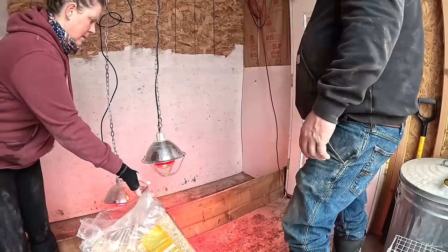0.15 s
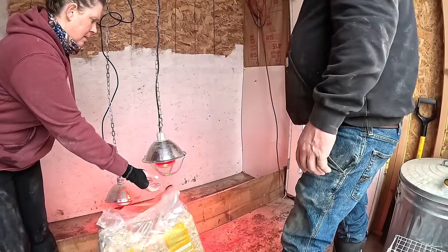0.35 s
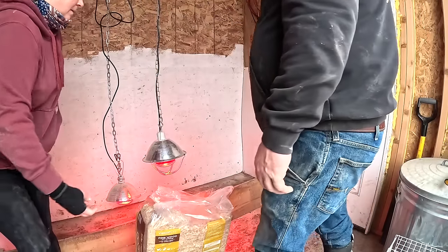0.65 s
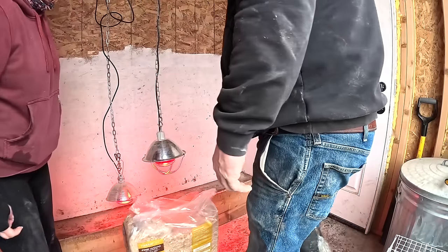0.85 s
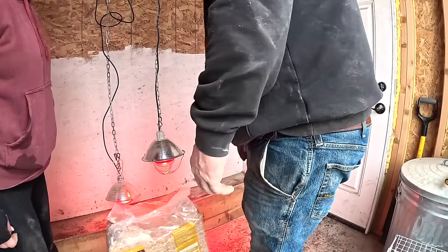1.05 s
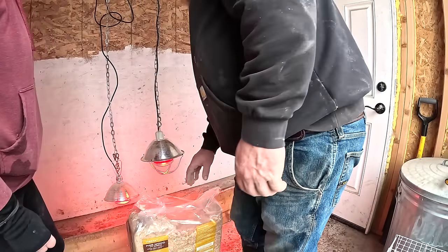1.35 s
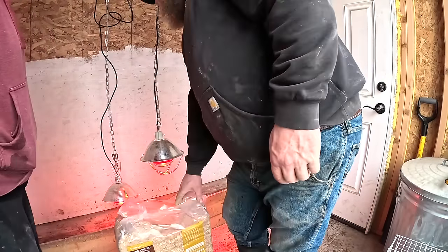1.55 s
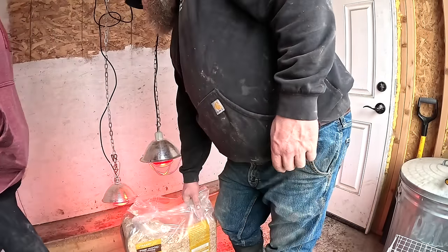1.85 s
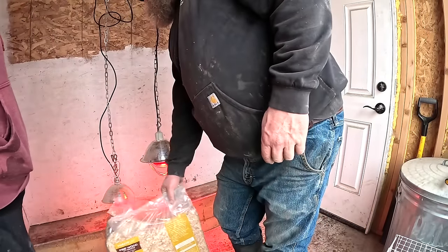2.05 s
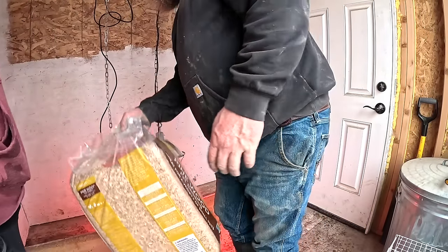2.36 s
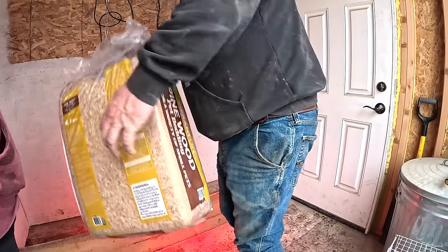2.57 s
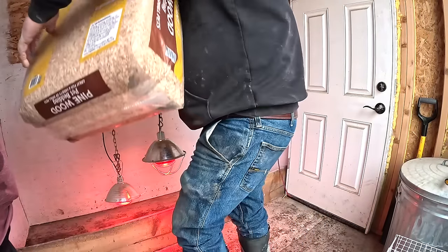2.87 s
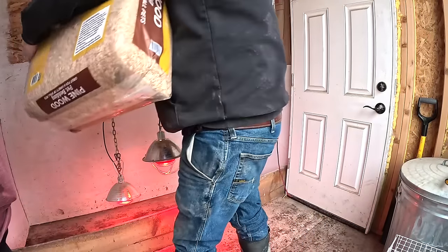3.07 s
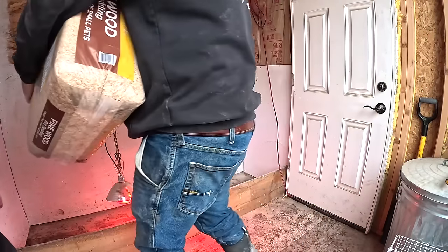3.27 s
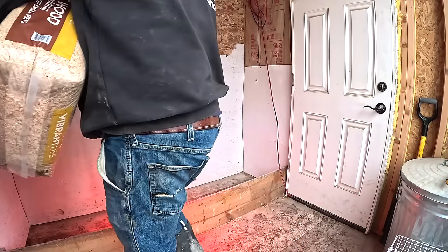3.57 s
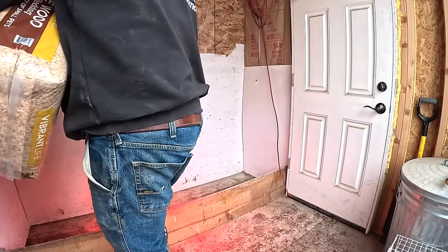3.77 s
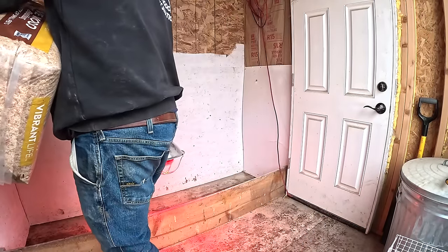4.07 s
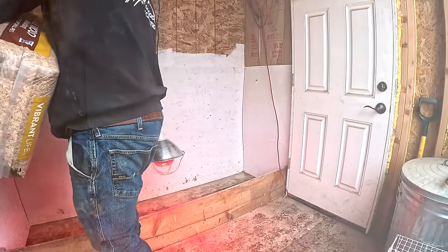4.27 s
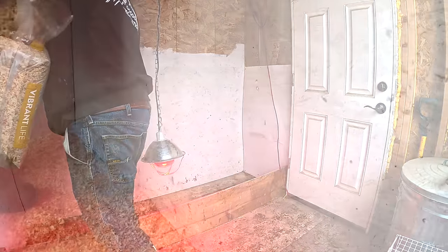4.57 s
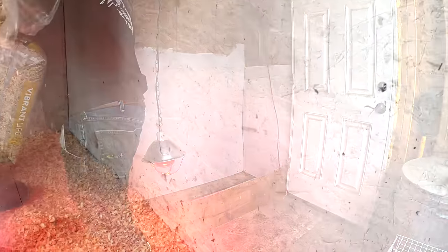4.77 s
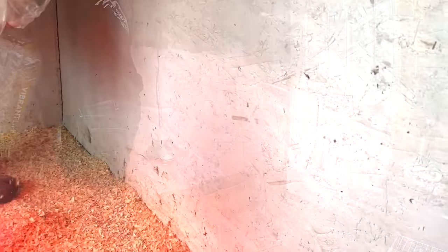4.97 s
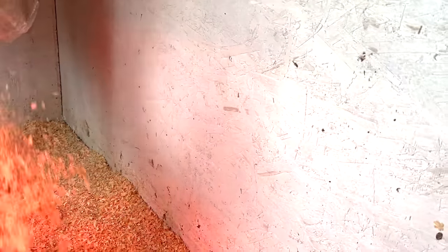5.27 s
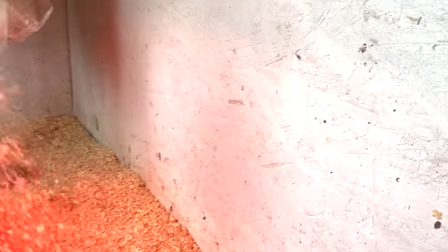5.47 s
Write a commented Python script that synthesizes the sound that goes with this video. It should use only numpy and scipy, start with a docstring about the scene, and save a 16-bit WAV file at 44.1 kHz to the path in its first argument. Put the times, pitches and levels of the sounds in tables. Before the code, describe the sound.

Close stereo camera sound inside a tight wooden room: low booming knocks and crunching packed shavings at first, slightly left, then quieter boot steps with one faint squeak. Sharp plastic crackles mark the bale being picked up; another strong floor thud, light rustling and softer steps lead to surging, fizzy spills of dry flakes.

```python
"""Boots and a bale of wood shavings strike the hollow floor of a small wooden coop: each blow rings decaying modes.
The bale, dragged in and tipped upright, crunches in bursts of dull grains; its plastic wrap rustles as
trains of random clicks and snaps as short ringing tones while the bale is lifted and swung.
The shavings then pour out in hissing, pattering surges of dense random impacts.
Behind them a boot squeaks once and filtered noise makes the floor sway and drum under shifting weight."""
import sys
import numpy as np
from scipy import signal
from scipy.fft import rfft, irfft, next_fast_len
from scipy.io import wavfile
from scipy.ndimage import map_coordinates

SR = 44100
rng = np.random.default_rng(int(sys.argv[2]) if len(sys.argv) > 2 else 0)


def dump_mix(stems):
    """Bounce the given channels to the path in sys.argv[1] as a 16-bit WAV at rate SR."""
    frames = np.atleast_2d(stems).T  # one column per channel
    limited = np.clip(frames, -1, 1)  # hard clip at full scale
    pcm = np.round(limited * 32767).astype(np.int16)
    wavfile.write(sys.argv[1], SR, pcm)


N = 248283

# Blows on the floor: (time [s], relative level [dB], contact time [s], scuff relative to ringing [dB])
FLOOR_BLOWS = [(.002,-17,0.0055,-6),(.068,-25,0.00071,-18),(.144,-26.5,0.0023,2.5),(.396,-17,0.00099,6.5),(0.421,-9.5,0.0011,-1),(.445,-11,.0028,0.5),
               (.566,-28,0.0087,-6),(.655,-19,0.004,-4.5),(.922,-27,0.0078,-8),(1.133,-16,0.0032,-21),(1.195,-19,0.0049,-21),(1.476,-19,0.01,-11.5),(2.021,-25.5,0.013,-16),(2.131,-25,.011,-12),
               (2.81,-36,0.0028,1),(3.001,-9,0.0081,-7),(3.028,-9.5,0.007,-7.5),(3.338,-18.5,0.0046,-3),(3.475,-32.5,.005,-3),(4.024,-16,0.0073,-22),(4.048,-14,0.0056,-11),(4.101,-19.5,0.0013,-2),
               (4.235,-18.5,.0013,-26),(4.358,-27.5,0.0014,-12),(4.503,-23,0.011,-14),(4.596,-23,0.0086,-9.5),(4.94,-36,0.0088,-8)]
# Modes of floorboards and joists: (nominal frequency [Hz], mean relative level [dB], t60 [s])
FLOOR_MODES = [(35.7,-37,0.49),(69.5,3.5,0.4),(87.8,-3,0.18),(109,3.5,0.18),(137.7,-6.5,0.39),(163.6,-2,0.26),(187.4,-8,0.21),(220.6,-6.5,0.13),(262.4,-11,0.49),(296,-2,0.31),(355.5,-14,0.25),(437,-11,0.11),(513,-15,0.31),(685,-9,0.38),(900,-23,0.23),(1027,-21,0.17),(1150,3,0.16),(1320,-2,0.25)]
# Packed shavings crunching as the bale lands or is gripped and shoved, and two soft hand pats near 1.98 s and
# 2.53 s: (time [s], level [dB], rise time constant [s], t60 [s])
BALE_CRUNCHES = [(0.011,-24,0.0042,0.12),(0.066,-19,.001,0.027),(0.145,-26.5,.002,0.042),(0.394,-12,0.0007,0.21),(0.414,-15.5,0.0016,0.54),(.65,-51,0.013,0.17),(1.984,-26,0.0014,0.058),(2.53,-33,0.0019,0.072),(4.11,-40,0.025,0.36),(4.2,-30,0.022,0.2),(4.359,-31,.0008,0.13)]
# Shoves and jolts of the wrapped bale:
# (start [s], rise [s], hold [s], relative rustle level [dB], rubbing before its own gain, re rustle [dB])
BALE_SHOVES = [(0,0.001,0.022,-29,-5), (0.134,.02,0.011,-42.5,5), (.24,0.047,.06,-54,8),
               (0.316,0.041,0.077,-41,7), (0.616,0.047,0.0078,-58.5,10), (0.818,0.072,0.065,-61,9.5),
               (1.018,0.029,0.0088,-54.5,-23), (1.129,0.011,0.038,-45,3.5), (1.465,0.016,0.012,-51,-3),
               (2.09,.02,0.0081,-45.5,-8), (2.222,0.012,0.009,-46.5,-12), (2.517,0.017,.01,-51,4),
               (2.753,0.027,0.015,-52.5,-17), (2.91,0.01,.01,-49,0), (2.996,.007,0.032,-36.5,-8),
               (3.094,0.033,0.038,-54.5,11), (3.212,0.085,0.091,-45.5,4), (3.632,0.055,0.01,-47,-1),
               (3.821,.01,0.013,-51.5,-8), (4.013,0.086,0.046,-44.5,5), (4.122,0.019,0.018,-36,-9),
               (4.187,0.011,0.045,-52,13.5), (4.322,0.028,0.05,-47,1)]
# The wrap gathered in one hand and the bale lifted by it: (time [s], relative rustle level [dB])
LIFT_RUSTLE = [(1.5, -65), (1.54, -57), (1.644, -49.5), (1.864, -43), (1.922, -41.5), (2.308, -52),
               (2.436, -50), (2.99, -52.5)]
# Creases of the wrap snapping: (time [s], level [dB], pitch [Hz])
CREASE_SNAPS = [(.166,-32,3020),(.1705,-24.5,6760),(1.764,-21.5,2950),(1.802,-26,4470),(1.903,-19,3960),(1.958,-16.5,3150),(2.193,-27,7500),(2.246,-23.5,4700),
                (2.321,-19,3780),(2.458,-22.5,2260),(2.5068,-15.5,3500),(2.6032,-16,2750),(2.607,-23,5600),(2.6829,-26.5,1560),(3.002,-25,3230),(4.019,-30,1500),(4.908,-24,3200),
                (5.293,-27.5,2500),(5.38,-16.5,2400),(5.41,-40,4940),(5.468,-20,6640)]
# Clumps of shavings breaking loose: (start [s], rise [s], hold [s], relative hiss level [dB])
CLUMP_SURGES = [(4.495,0.016,0.093,-43.5), (4.883,0.02,0.073,-44), (4.964,0.077,0.0088,-36),
                (5.291,.004,.05,-40.5), (5.328,0.049,0.08,-38.5), (5.565,0.034,0.015,-44.5)]
# Weight shifting on the floor: (time [s], relative sway level [dB], relative drumming level [dB])
FLOOR_WEIGHT = [(0.0, -18, -24), (0.19, -30, -46), (0.41, -40, -34.5), (0.53, -30, -28.5),
                (0.94, -37.5, -45.5), (2.22, -41.5, -46.5), (2.52, -43.5, -53), (3.31, -36.5, -36),
                (3.75, -48, -70), (4.03, -46.5, -69), (4.19, -36, -37), (5.14, -68, -56.5),
                (5.63, -69, -46)]

# Spectra, all as (frequency [Hz], relative level per Hz [dB])
# Crunching packed shavings
CRUNCH_SPECTRUM = [(88, -37), (150, -2), (278, -2.5), (398, -6.5), (427, -5.5), (622, -12), (1090, -11),
                   (1570, -17.5), (1830, -19), (3060, -37.5), (9000, -63), (11700, -78), (19800, -120)]
# Crinkling plastic film
FILM_SPECTRUM = [(760, 1.5), (1300, -1), (1460, -2), (2090, -0.5), (3300, -1.5), (6280, -11), (7410, -11),
                 (8840, -17), (11000, -25), (12600, -21.5), (15500, -44)]
# Bale rubbing beneath the film
RUB_SPECTRUM = [(110,-20),(220,-8.5),(350,2),(520,-2.5),(800,-4),(1150,-5),(1600,-8.5),(2100,-13.5),(3000,-17),(5000,-120)]
# Hiss of falling flakes
FLAKE_SPECTRUM = [(650,-18),(1100,0.5),(1700,-0.5),(3500,0.5),(6000,-4.5),(8500,-6),(12000,-6),(14500,-6.5),(15500,-18.5)]
# Patter on the heap
HEAP_SPECTRUM = [(71, -23), (120, -0.5), (171, -5.5), (200, -5), (356, -2), (586, -4), (924, -4),
                 (1700, -11), (2210, -10), (3740, -120)]
# Swaying of the floor
SWAY_SPECTRUM = [(10,-18),(22,8.5),(36,-2),(55,-7),(110,-57),(300,-120)]
# Drumming of the floor
DRUM_SPECTRUM = [(31, -39), (52, -5.5), (78, 6), (156, -15.5), (194, -5), (231, -14), (407, -16),
                 (450, -19.5), (580, -68), (990, -120)]

# Stereo image of floor and bale: (time [s], gain of the side signal [dB])
IMAGE_WIDTH = [(0,-6),(.3,-15.5),(.4,-26),(.58,-47),(.7,-69),(2.9,-40),(3.05,-21),(3.9,-15.5),(4.2,-14.5),(4.6,-11)]
# The bale dragged in from the left: (time [s], left minus right [dB])
BALE_LEFT_BALANCE = [(0,4),(.09,1.5),(.42,1),(.55,0)]
# Falling shavings at two microphone ports: (frequency [Hz], correlation [0 to 1])
POUR_CORRELATION = [(150,0.87),(500,0.68),(1600,.1),(4000,1),(5600,0.58),(6800,0.8),(10000,1),(15000,0.95)]
# Phase of the same sound at the ports: (frequency [Hz], lead of left over right [rad])
POUR_PHASE_LEAD = [(100,-1),(1000,0.65),(4500,0.88),(5700,1.2),(7200,-0.5),(8400,-0.7),(9900,-3.5),(11400,-4.5),(13000,-7),(15400,-9)]


def floor_thumps():
    """Modal excitation: each blow rings the boards, a longer contact is duller, and the sole or bale scuffs."""
    out, t = np.zeros(N), np.arange(SR // 2) / SR
    hz, mode_db, t60 = np.transpose(FLOOR_MODES)[:, :, None]
    scuff_band = signal.butter(2, [65, 220], "band", fs=SR, output="sos")
    for s, db, contact, scuff_db in FLOOR_BLOWS:
        uneven_db = 2 * rng.standard_normal(hz.shape)
        strength = amp(mode_db + uneven_db) / np.hypot(1, (hz * contact) ** 3)
        # the boards give differently from spot to spot
        pitch = hz * (1 + 0.0208 * rng.standard_normal(hz.shape))
        sign = rng.choice([-1, 1], hz.shape)
        modes = sign * strength * amp(-60 * t / t60) * np.sin(2 * np.pi * pitch * t)
        ring = np.sum(modes, axis=0)
        scuff = unit(signal.sosfilt(scuff_band, rng.standard_normal(len(t))))
        scuff = amp(scuff_db - 60 * t / 0.49) * scuff
        onset = 1 - np.exp(-t / 0.0018)
        add(out, s, amp(db - 8.5) * (ring + scuff) * onset)
    return out


def bale_crunches():
    """Granular failure: compressed shavings give way in a dense burst of dull grains; soft pats on the bale
    sound as short dull bursts too."""
    force, t = np.zeros(N), np.arange(SR) / SR
    for s, db, rise, t60 in BALE_CRUNCHES:
        add(force, s, amp(db - 60 * t / t60) * (1 - np.exp(-t / rise)))
    return force * coloured(ticks(rate=4000, spread_db=2.5), CRUNCH_SPECTRUM)


def wrap_rustle():
    """Buckling: tiny creases click in clusters, more of them the harder the film is handled; the bale rubs."""
    rustle_db, rub_db = handling()
    rate = 1500 * amp(0.54 * (rustle_db + 46.0))
    # dividing by the root of the rate keeps density from setting the level
    creases = amp(2.76 * wobble(55)) * ticks(rate, spread_db=1.5) / np.sqrt(rate)
    crinkle = coloured(coop(creases, wet_db=2.0), FILM_SPECTRUM)
    grains = amp(1.9 * wobble(45)) * ticks(rate=1800, spread_db=3.5)
    rub = coloured(coop(grains, wet_db=-3.0), RUB_SPECTRUM)
    return amp(rustle_db + 3.0) * crinkle + amp(rub_db + 1.5) * rub


def handling():
    """Power addition: shoves, the long lift and faint creasing combine into rustle and rubbing levels."""
    moves = []
    for start, rise, hold, db, rub_db in BALE_SHOVES:
        # the film comes to rest after a shove
        moves.append((amp(db) * swell(start, rise, hold, fall_db_per_s=122), rub_db))
    tugs_db = 2 * wobble(14)  # the hand tugs unevenly
    lift = amp(curves(LIFT_RUSTLE)[0] + 1.5 + tugs_db)
    moves.append((lift * during(LIFT_RUSTLE[0][0], LIFT_RUSTLE[-1][0]), -1))
    # faint creasing throughout, and more while the bale hangs in the arms
    moves.append((amp(-66.5) + amp(-59.5) * during(3.0, 4.9), 0))
    rustle_db = total_db(gain for gain, _ in moves)
    rub_db = total_db(gain * amp(rub_db) for gain, rub_db in moves)
    return rustle_db, rub_db


def wrap_snaps():
    """Sudden release of tension: a large crease cracks, the taut film rings briefly and the walls answer."""
    out, t = np.zeros((2, N)), np.arange(SR // 20) / SR
    ring_cycles, crack_db = 8.7, -9.5  # cycles to fall 60 dB; crack gain relative to the ring [dB]
    crack_lowpass = signal.butter(2, 8000, fs=SR)
    for s, db, hz in CREASE_SNAPS:
        ring = np.sin(2 * np.pi * hz * t) * amp(-60 * t * hz / ring_cycles)
        crack = signal.lfilter(*crack_lowpass, rng.standard_normal(len(t))) * amp(-60 * t / 0.00033)
        add(out[0], s, amp(db) * (ring + amp(crack_db) * crack))  # mid only
    return coop(out, wet_db=-1.5, t60=0.15)


def shavings():
    """Random impact noise: dry flakes slide out in clumps and patter; a thicker flow is denser and fizzes more."""
    pour_start_s, pour_end_s = 4.485, 5.63
    # each clump runs out after its hold
    clumps = [amp(db) * swell(s, rise, hold, fall_db_per_s=123) for s, rise, hold, db in CLUMP_SURGES]
    trickle = amp(-47.5)  # loose flakes fall all the while
    hiss_db = total_db(clumps + [trickle])
    flow_db = hiss_db - np.max(hiss_db)
    rate = 7000 * amp(.7 * flow_db)
    flakes = amp(1.5 * wobble(90)) * ticks(rate, spread_db=1.0) / np.sqrt(rate)
    hiss = coloured(coop(flakes, wet_db=-5.5), FLAKE_SPECTRUM)
    treble = filtered(hiss, lambda hz: 1 / (1 + (6000 / (hz + 1)) ** 4))
    fizz = treble * (amp(0.44 * flow_db + 1.9) - 1)
    patter = coloured(coop(ticks(rate=3000, spread_db=5.0), wet_db=-3.5), HEAP_SPECTRUM)
    # the patter softens as the heap covers the boards
    patter_db = -4.5 * np.maximum(np.arange(N) / SR - pour_start_s, 0)
    return during(pour_start_s, pour_end_s) * amp(hiss_db + 4.5) * (hiss + fizz + amp(patter_db) * patter)


def squeak(hz=2060, db=-49, t60=0.29):
    """Frictional tone: a faint, thin squeak with a third harmonic and drifting phase as a boot turns."""
    out, t = np.zeros(N), np.arange(SR // 4) / SR
    phase = 2 * np.pi * hz * t + 0.085 * np.cumsum(rng.standard_normal(len(t)))
    envelope = amp(db - 60 * t / t60) * (1 - np.exp(-t / 0.0025))
    add(out, .893, envelope * (np.sin(phase) + 0.21 * np.sin(3 * phase)))
    return out


def floor_load(sway_db=1, drum_db=0.5):
    """Forced vibration: the hollow floor sways and drums under shifting weight, more just after each blow."""
    slow_db, fast_db = curves(FLOOR_WEIGHT)
    blows_db = total_db(amp(db) * swell(s, 0.023, 0, fall_db_per_s=88) for s, db, _, _ in FLOOR_BLOWS)
    # sway grows 1.5 dB for each dB of the blow: only heavy blows move the joists
    sway = np.hypot(amp(slow_db + sway_db), amp(1.5 * blows_db - 6))
    drum = np.hypot(amp(fast_db + drum_db), amp(blows_db - 21))
    sway_sound = sway * coloured(rng.standard_normal(N), SWAY_SPECTRUM)
    return sway_sound + drum * coloured(rng.standard_normal(N), DRUM_SPECTRUM)


def coop(x, wet_db, t60=0.48):
    """Reverberation: close wooden walls add a short, dense tail that changes as the source moves."""
    out, block, hop = np.array(x), SR // 5, SR // 14
    # the tail is silent for its first 2.5 ms
    fade = amp(-60 * np.arange(block) / SR / t60) * (np.arange(block) > SR // 400)
    for start in range(0, N, hop):
        tail = rng.standard_normal((2, block)) * fade / np.linalg.norm(fade)
        add(out, start / SR, amp(wet_db) * signal.fftconvolve(x[:, start:start + hop], tail, axes=1))
    return out


def ports(pair, alike, lead):
    """Partial coherence: a close source reaches the left and right ports partly alike and out of step."""
    def turn(hz):
        return np.arccos(np.clip(along(alike, hz), 0, 1)) / 2

    shared, apart = filtered(pair, lambda hz: [np.cos(turn(hz)), np.sin(turn(hz))])
    half = np.array([[.5], [-.5]])
    left_right = np.array([shared + apart, shared - apart])
    return filtered(left_right, lambda hz: np.exp(1j * half * along(lead, hz)))


def spread(pair, diffuse_hz=12000):
    """Mid-side summation: the image widens and narrows, and the highest treble of the side always passes."""
    mid, apart = pair
    width_db, = curves(IMAGE_WIDTH)
    treble = filtered(apart, lambda hz: 1 / (1 + (diffuse_hz / (hz + 1)) ** 20))
    side = amp(width_db) * apart + treble
    return np.array([mid + side, mid - side])


def panned(pair, left_db):
    """Level difference: lean a stereo pair to the left."""
    return pair * amp(np.array([[.5], [-.5]]) * left_db)


def swell(start, rise, hold, fall_db_per_s):
    """Exponential decay: an envelope rises linearly to 1, holds, then dies away."""
    t = np.arange(N) / SR - start
    return np.clip(t / rise, 0, 1) * amp(-fall_db_per_s * np.clip(t - rise - hold, 0, 2))


def total_db(gains):
    """Incoherent summation: the level of several unrelated sounds together."""
    return 10 * np.log10(sum(g ** 2 for g in gains) + 1e-12)


def ticks(rate, spread_db):
    """Poisson-like impacts: two random trains, rate a second, a few much larger than the rest."""
    chance, size = rng.random((2, N)), rng.standard_normal((2, N))
    sign = rng.choice([-1, 1], (2, N))
    return unit((chance < rate / SR) * sign * amp(spread_db * np.clip(size, -3, 2.5)))


def wobble(rate):
    """Spline interpolation: a smooth random curve, rate knots a second."""
    return map_coordinates(rng.standard_normal(int(N * rate / SR) + 4), [np.arange(N) * rate / SR])


def coloured(x, spectrum):
    """Spectral shaping: x filtered by the given spectrum, at rms 1."""
    return unit(filtered(x, lambda hz: amp(along(spectrum, hz))))


def filtered(x, response):
    """Linear filtering: the spectrum of x times a complex response of frequency."""
    m = next_fast_len(N + SR // 2)
    return irfft(rfft(x, m) * response(np.fft.rfftfreq(m, 1 / SR)), m)[..., :N]


def along(points, hz):
    """Logarithmic frequency: interpolate (frequency [Hz], value) points on a log axis."""
    f, v = np.transpose(points)
    return np.interp(np.log(hz + 1), np.log(f + 1), v)


def curves(rows):
    """Linear interpolation: one value per sample for each column after the time."""
    s, *cols = np.transpose(rows)
    return [np.interp(np.arange(N) / SR, s, c) for c in cols]


def during(start, end, fade=0.015):
    """Gating: 1 from start to end, fading to 0 outside."""
    return np.interp(np.arange(N) / SR, [start - fade, start, end, end + fade], [0, 1, 1, 0])


def add(track, s, sound):
    """Superposition: mix a sound into a track at time s."""
    start = max(round(s * SR), 0)
    part = sound[..., :N - start]
    track[..., start:start + part.shape[-1]] += part


def amp(db):
    """Logarithmic level: decibels to gain."""
    return 10 ** (np.asarray(db) / 20)


def unit(x):
    """Normalization: scale to rms 1."""
    return x / np.sqrt(np.mean(x ** 2) + 1e-20)


def scene():
    """Superposition: floor straight ahead, bale from the left, shavings close by and off to one side."""
    boards = floor_thumps() + floor_load() + squeak()
    wall_echo = amp(-8.5) * np.pad(boards, (SR // 90, 0))[:N]  # 11 ms late, in the side signal
    bale = spread(bale_crunches() + wrap_rustle() + wrap_snaps())
    bale = panned(bale, curves(BALE_LEFT_BALANCE)[0])
    pour = panned(ports(shavings(), POUR_CORRELATION, POUR_PHASE_LEAD), left_db=0.6)
    return spread([boards, wall_echo]) + bale + pour


def record(dry):
    """Saturation and band limiting: the camera rounds off the highest peaks and keeps nothing above 15.5 kHz."""
    rounded = dry / (1 + (dry / .75) ** 6) ** (1 / 6)
    return filtered(rounded, lambda hz: hz < 15500)


dry = scene()
out = record(dry)
dump_mix(out)
```